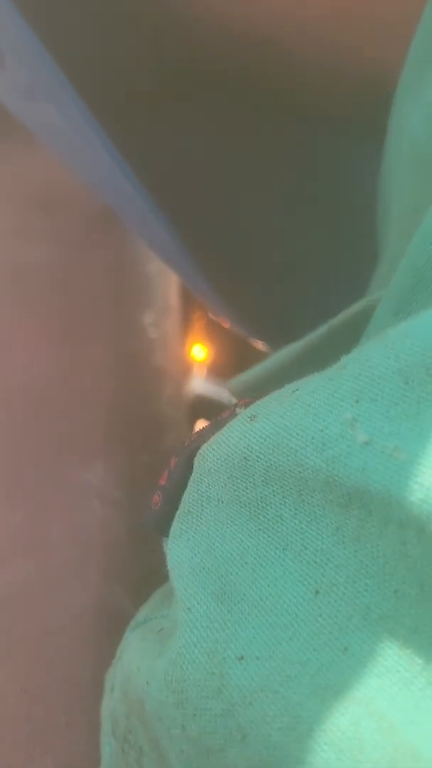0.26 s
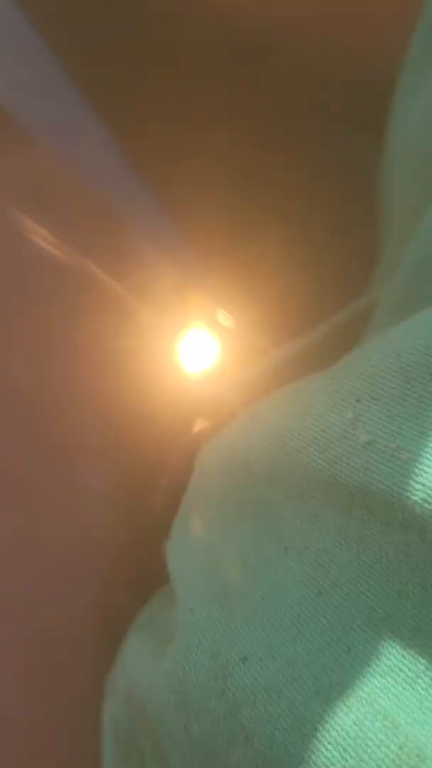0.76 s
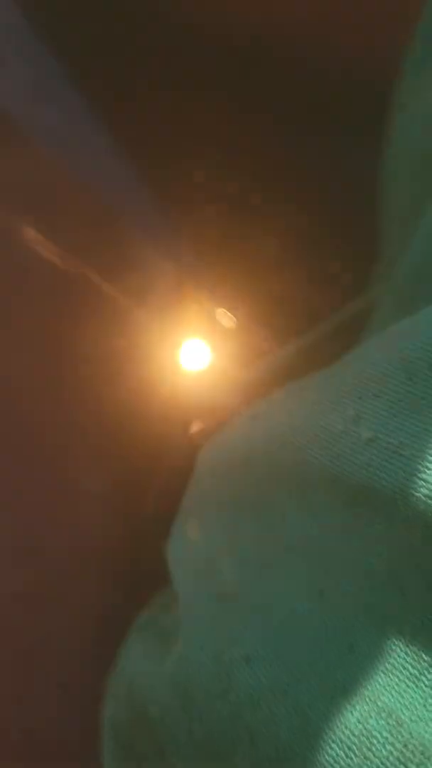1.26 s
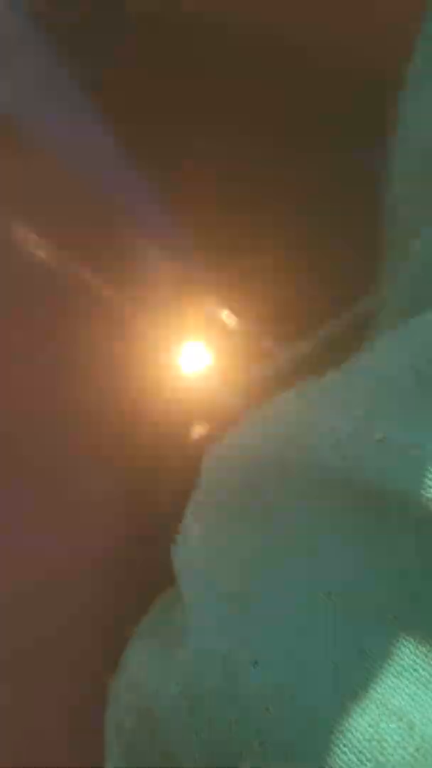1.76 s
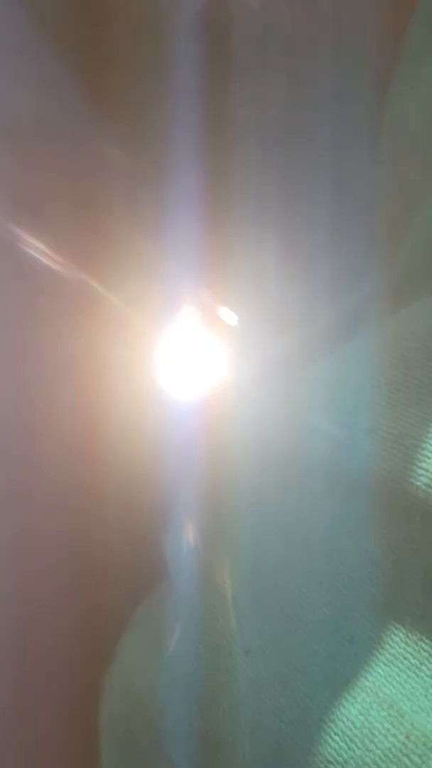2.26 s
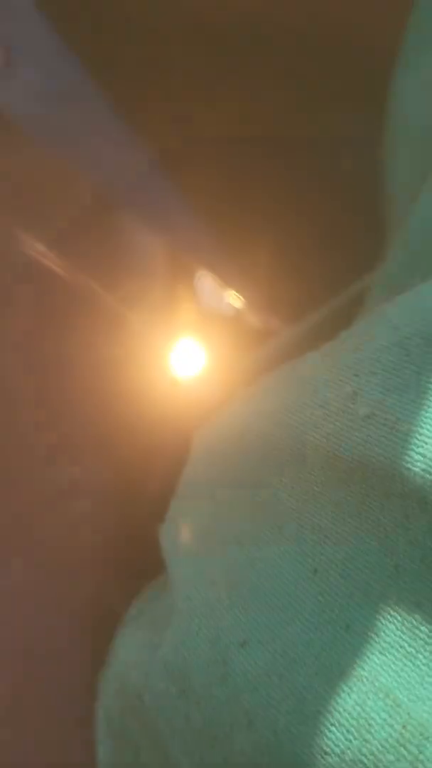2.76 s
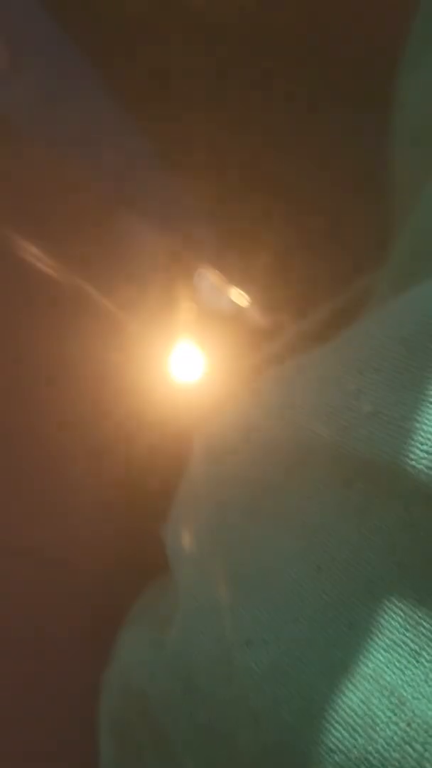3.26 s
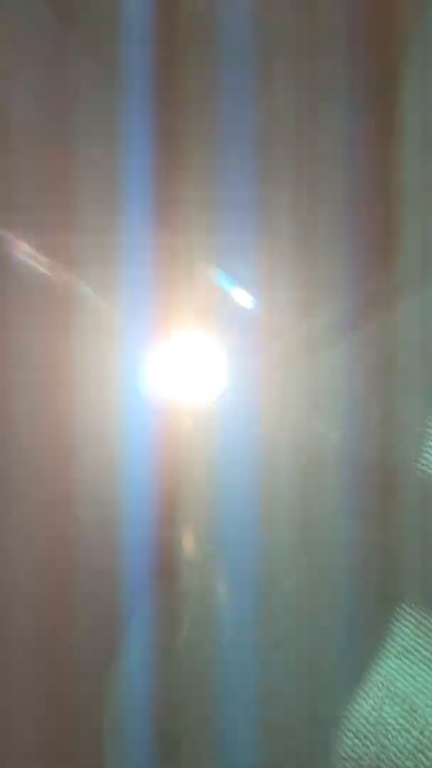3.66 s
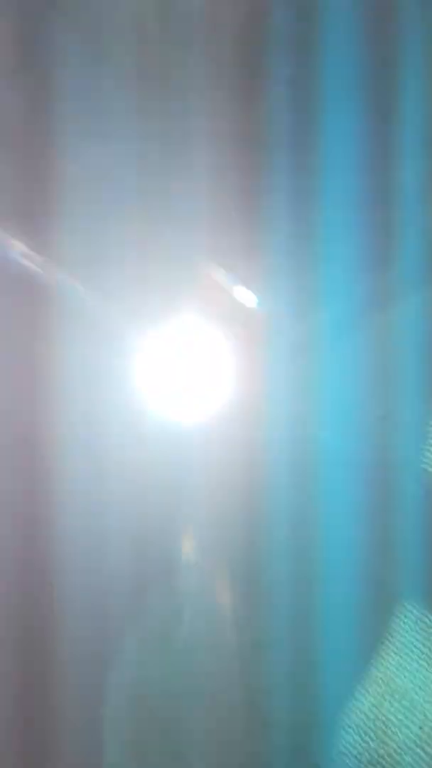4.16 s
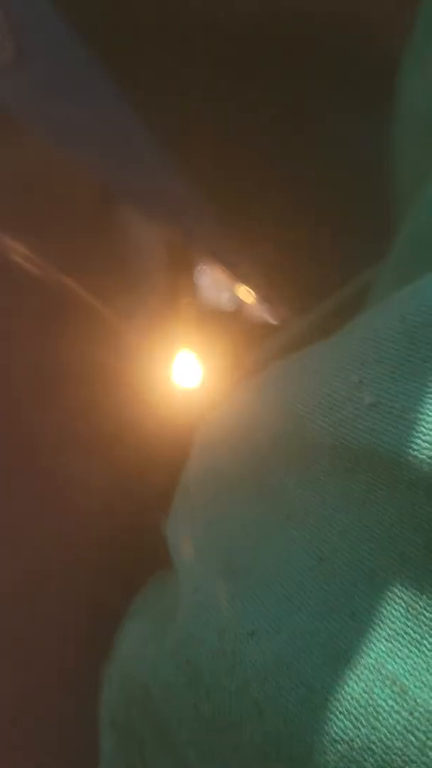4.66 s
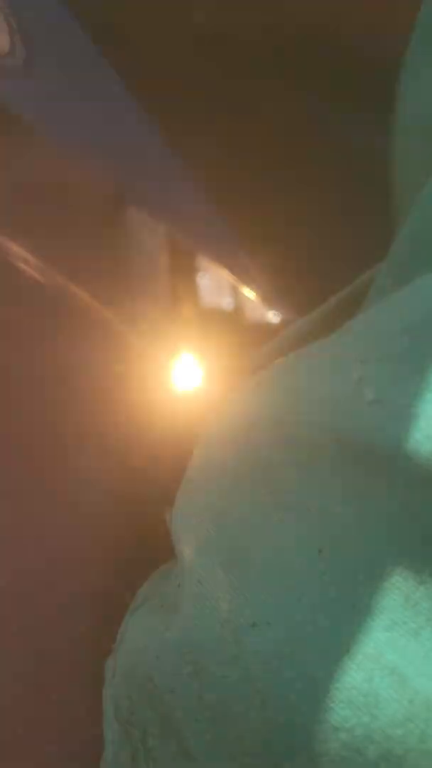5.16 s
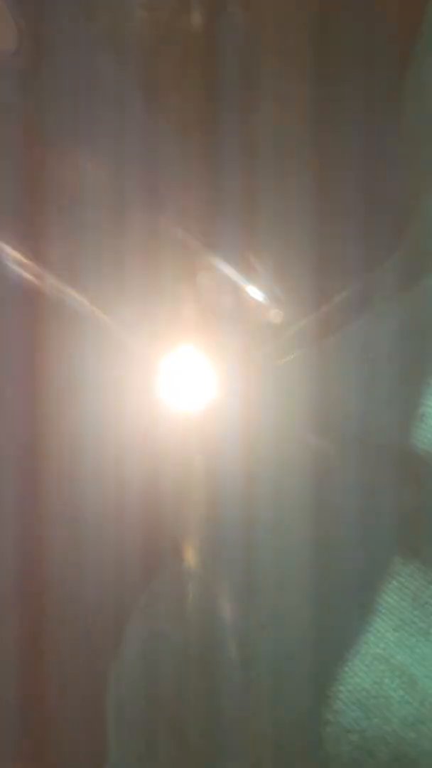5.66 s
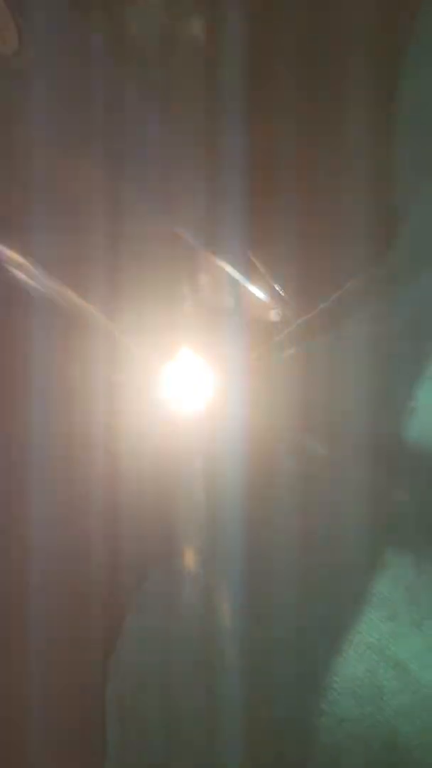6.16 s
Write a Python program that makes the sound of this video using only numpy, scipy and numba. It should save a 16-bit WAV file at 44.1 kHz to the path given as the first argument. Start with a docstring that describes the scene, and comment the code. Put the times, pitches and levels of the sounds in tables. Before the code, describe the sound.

A close stereo phone microphone picks up a continuous, bright and breathy air jet with low wind-like thumps. Over it an electric arc sputters on and off, each burst a tearing crackle of a few hundredths to a tenth or two of a second, often closed by a short low knock. The steel work rings briefly and hollowly. Towards the end the bursts run almost together, with the arc still roaring at the finish.

```python
"""A steel workshop: air carbon arc gouging in a seam, close to a phone with two microphone ports.
An air jet hisses all the time, made of coloured noise, and its gusts buffet the ports with rumbling noise.
The arc strikes, roars for a moment and breaks: bursts of fluttering noise with a growl, hiss and sharp spits.
Many breaks bring a dull pop, made of short dying tones. The left port hears the torch a fraction of a
millisecond before the right. The phone evens out the level, rounds loud peaks and cuts the top."""
import sys
import numpy as np
from scipy import signal
from scipy.fft import rfft, irfft, next_fast_len
from scipy.io import wavfile
from scipy.ndimage import uniform_filter1d
from numba import njit

SR = 44100
rng = np.random.default_rng(int(sys.argv[2]) if len(sys.argv) > 2 else 0)


def int16_out(signal):
    """Quantize to a 16-bit WAV file."""
    q = np.round(np.clip(np.atleast_2d(signal).T, -1, 1) * 32767)
    wavfile.write(sys.argv[1], SR, q.astype(np.int16))


N = 283112  # samples in the scene
SIZE = next_fast_len(N)
HZ = np.maximum(np.fft.rfftfreq(SIZE, 1 / SR), 1)  # frequency of each spectrum bin
# Source levels below stand before the groove, the mix and the phone change them.
# Colour of the top hiss of both arc and jet.
# Each row: frequency in Hz, relative level at the left port in dB, at the right port in dB.
HISS_COLOUR = [(9480, -14, -24), (11120, -8, -14), (12200, -1.5, -3.5), (13000, 0, -2.5),
               (13900, -2.5, -4.5), (15000, -1.5, -5.5), (17000, -1.5, -6)]
HISS_BAND = (11000, 15800)  # Hz
HISS_ALIKE = .6  # share of the hiss that both ports hear alike


def undb(db):
    """Turns a level in dB into a gain."""
    return 10 ** (np.asarray(db) / 20)


def walk(rate):
    """Slow random wobble: about `rate` new levels a second, smoothed twice, with a spread near 1."""
    hold = int(SR / rate)
    steps = np.repeat(rng.standard_normal(N // hold + 1), hold)
    smooth = uniform_filter1d(uniform_filter1d(steps, hold), hold)
    return 1.3 * smooth[:N]


def curve(table):
    """Joins the rows of a time table with straight lines, giving one value a sample for each column."""
    seconds, *columns = np.transpose(table)
    return [np.interp(np.arange(N) / SR, seconds, column) for column in columns]


def trail(right):
    """Turns the phase of a spectrum, since sound reaches the right port over a longer path."""
    # How far the right port trails the left. Each row: frequency in Hz, lag in radians.
    lag = [(0, 0), (330, .6), (600, 2.5), (1000, 3.4), (1400, 5.2), (2000, 6.6), (2840, 8.9), (4000, 9.3),
           (5170, 9.7), (6370, 14.4), (7750, 22.4), (8790, 22.3), (10600, 28.6), (12200, 31.1),
           (13400, 37.7), (16500, 38.8)]
    return right * np.exp(-1j * np.interp(HZ, *np.transpose(lag)))


def ports(colour, gain, likeness, band, spits=0):
    """Noise coloured for each port, partly shared; gain 1 gives rms 1 within band, averaged over the ports."""
    # The likeness fades in much of the treble. Each row: frequency in Hz, share of the likeness kept.
    kept_likeness = [(3600, 1), (4800, .55), (10000, .55), (11000, .3), (12600, .5), (13400, 1),
                     (14300, .55)]
    colour_hz, *port_dbs = np.transpose(colour)
    shape = undb([np.interp(np.log(HZ), np.log(colour_hz), db, left=-90, right=-90) for db in port_dbs])
    inside = (HZ > band[0]) & (HZ < band[1])
    shape = shape / np.sqrt(np.mean((shape * inside) ** 2))
    share = np.clip(likeness * np.interp(HZ, *np.transpose(kept_likeness)), 0, 1)
    both, left, right = (rfft(gain * rng.standard_normal(N), SIZE) for _ in range(3))
    both = both + rfft(gain * spits, SIZE)
    left = np.sqrt(share) * both + np.sqrt(1 - share) * left
    right = np.sqrt(share) * trail(both) + np.sqrt(1 - share) * right
    return irfft(shape * np.array([left, right]), SIZE)[:, :N]


def buffet():
    """Gusts from the jet swell and pass, rumbling on each port mostly on its own."""
    # Each row: time of the peak in seconds, peak level in dB (added to the calm), length in seconds.
    gust_list = [(.07, -34, .08), (.21, -34, 0.082), (0.457, -28, 0.11), (0.944, -29, 0.38),
                 (1.35, -25, 0.26), (1.82, -33, 0.14), (2.318, -29, 0.079), (2.692, -31, 0.16),
                 (3.045, -28, 0.19), (3.377, -26, 0.068), (3.915, -26, 0.24), (4.68, -31, 0.042),
                 (4.776, -22.5, 0.044), (4.876, -24, .08), (5.03, -30.5, 0.15), (5.31, -28, 0.27),
                 (5.627, -30, .15), (6.096, -31, 0.38), (6.37, -31, .06)]
    # Each row: frequency in Hz, relative level at the left port in dB, at the right port in dB.
    rumble_colour = [(20, -36, -24), (35, -8.5, -9), (54, -3, -5), (94, -4.5, -2), (138, -10, -15.5),
                     (200.5, -10.5, -8)]
    calm_db = -36.5  # rumble between gusts
    t = np.arange(N) / SR
    power = undb(calm_db) ** 2
    for peak_s, peak_db, length_s in gust_list:
        power = power + undb(peak_db) ** 2 * np.exp(-(2 * (t - peak_s) / length_s) ** 2)
    return ports(rumble_colour, np.sqrt(power) * undb(1.3 * walk(18)), 0.12, (30, 140))


def jet():
    """Turbulent air: a low rush, a broad body, a thin edge and a bright top hiss."""
    # Each row: time in seconds, level of the body in dB, level of the top hiss in dB.
    jet_levels = [(0, -24.5, -19.5), (.55, -25, -22), (1.4, -29.5, -22), (2.17, -30, -22.5),
                  (2.81, -30, -23.5), (3.36, -28, -21.5), (4.32, -28, -20), (4.9, -27.5, -20.5),
                  (5.5, -26, -20), (6.42, -24.5, -17.5)]
    # Colours of rush, body and edge.
    # Each row: frequency in Hz, relative level at the left port in dB, at the right port in dB.
    rush_colour = [(108.5, -21, -10), (159, -4, -2), (298, -6, -5), (444, -19.5, -7), (543, -44, -21)]
    body_colour = [(413, -23, -49), (503, -4, -5.5), (745, 0.5, 1.5), (1230, 3.5, -1), (1440, -2, -4.5),
                   (1800, -1.5, 0), (2570, 1.5, 2.5), (3390, 3.5, 4.5), (4050, -5.5, -15)]
    edge_colour = [(3620, -16, -14), (3770, -6.5, 3.5), (5200, 4, 1), (6600, -3.5, -7), (8280, 4, -5),
                   (10630, 1, -11)]
    rush_db, edge_re_body_db = -34.5, -4
    body_db, hiss_db = curve(jet_levels)
    eddies_db = 0.25 * walk(5.5)
    rush = ports(rush_colour, undb(rush_db + 2.0 * walk(11)), 0.39, (150, 500))
    body = ports(body_colour, undb(body_db + eddies_db), .62, (1300, 3500))
    edge = ports(edge_colour, undb(body_db + edge_re_body_db + eddies_db), .5, (4000, 9500))
    hiss = ports(HISS_COLOUR, undb(hiss_db + 0.32 * walk(26.5)), HISS_ALIKE, HISS_BAND)
    return rush + body + edge + hiss


def pops():
    """The gas pocket collapses as the arc breaks and the groove rings briefly."""
    # Each row: time in seconds, level of the blow in dB.
    pop_blows = [(0.716,-6), (0.898,-16), (0.97,-6), (1.167,-4), (1.478,3), (1.687,-3), (2.022,-7),
                 (2.72,-6.5), (3.268,-8.5), (3.561,-6.5), (4.239,-5), (4.578,-10), (5.11,-5), (5.357,-6),
                 (5.675,-9), (5.799,-7), (5.969,-9)]
    # Tones of the ring. Each row: frequency in Hz, level in dB, time to fall by 60 dB in seconds.
    pop_tones = [(349, -6, 0.042), (494, -9, 0.048), (790, 0.5, 0.023)]
    left_db = -4  # left port compared with the right
    blows = np.zeros(N)
    for s, db in pop_blows:
        blows[int(s * SR)] = undb(db)
    t = np.arange(SR // 10) / SR
    ring = 0
    for hz, db, t60 in pop_tones:
        ring = ring + undb(db) * np.sin(2 * np.pi * hz * t) * np.exp(-np.log(1000) * t / t60)
    # the minus sign makes each pop start with a dip in pressure
    pop = rfft(signal.fftconvolve(blows, -ring)[:N], SIZE)
    return irfft(np.array([undb(left_db) * pop, trail(pop)]), SIZE)[:, :N]


def ringing_power(gain, t60):
    """Stores the power of a gain curve and lets it die away, by 60 dB in t60 seconds."""
    keep = np.exp(-2 * np.log(1000) / (t60 * SR))
    return signal.lfilter([1 - keep], [1, -keep], gain ** 2)


def boom(roar, t60, level_db):
    """The hollow steel work stores some of the roar and lets it die away slowly."""
    # Each row: frequency in Hz, relative level at the left port in dB, at the right port in dB.
    hollow_colour = [(420, -35, -23), (504, 1, -1), (840, -1, 0.5), (1030, -14, -5), (1300, -32, -19)]
    stored = np.sqrt(ringing_power(roar, t60))
    return ports(hollow_colour, undb(level_db) * stored, 0.8, (500, 950))


def burning(tail_t60, build_s, flare_db, flare_s):
    """Gains of roar, growl and top hiss: on at each strike, off at each break, a short ring of the site after."""
    # Each row: strike in seconds, break in seconds, level of the roar in dB, drift of the roar from
    # strike to break in dB, level of the low growl compared with the roar in dB.
    burns = [(0.539, 0.667, -19, 11, -8.5), (0.678, 0.726, -18, 11, -2.5), (0.729, 0.735, -18.5, 47, 4),
             (0.748, 0.787, -14, 1, -1), (0.849, 0.899, -16.5, 4.5, -0.5), (0.943, 0.97, -16.5, 15, 4),
             (1.063, 1.179, -15, 1, -9.5), (1.453, 1.49, -16, -2.5, -2.5), (1.651, 1.699, -14, -3, -3.5),
             (1.882, 2.003, -16, 1.5, -6.5), (2.007, 2.026, -14, 2, -3), (2.295, 2.366, -21.5, -3, -3.5),
             (2.361, 2.443, -15.5, 2.5, -7.5), (2.69, 2.725, -16.5, 5, -1.5), (2.88, 2.978, -16, 2.5, -4),
             (3.029, 3.112, -21.5, -3, -5.5), (3.113, 3.276, -21.5, 5.5, -6), (3.434, 3.484, -17, 8, 1),
             (3.537, 3.564, -14, 1, -2.5), (3.663, 3.796, -16, -0.5, -5.5), (3.939, 3.984, -16.5, 3, -2.5),
             (4.206, 4.251, -17, 0, -3), (4.383, 4.471, -18, -1, -6), (4.478, 4.58, -17.5, 3, -6),
             (5.016, 5.119, -17, 2, -8.5), (5.246, 5.366, -17, -0.5, -6), (5.434, 5.5, -16.5, 3, -3.5),
             (5.502, 5.591, -17, 0, -2), (5.635, 5.812, -17.5, 0, -2.5), (5.837, 5.916, -17, -4, 0.5),
             (5.934, 5.982, -16.5, 3, -0.5), (5.987, 6.43, -17, 2.5, -2.5)]
    # a burn starts a little under its level, swells, and sags just before the break
    strike_db, swell_s, sag_db, sag_s = -3, 0.0054, -4.5, 0.0057
    arc_hiss_db = -24  # alike in all burns once the flare has settled
    edge_s = .004  # softens each start and stop
    gains = np.zeros((3, N))
    for strike, stop, level_db, drift_db, growl_db in burns:
        i, j = int(strike * SR), min(int(stop * SR), N)
        since = np.arange(j - i) / SR
        roar_db = level_db + drift_db * np.linspace(-.5, .5, j - i)
        roar_db = roar_db + strike_db * np.exp(-since / swell_s)
        roar_db = roar_db + sag_db * np.exp((since + strike - stop) / sag_s)
        # the top hiss flares at the strike and settles
        hiss_db = arc_hiss_db + flare_db * np.exp(-since / flare_s)
        gains[:, i:j] = undb([roar_db, roar_db + growl_db, hiss_db])
    # the growl builds up as the melt pool grows, but stops with the arc
    slow = np.exp(-1 / (build_s * SR))
    built_up = signal.lfilter([1 - slow], [1, -slow], gains[1])
    gains[1] = np.minimum(gains[1], built_up)
    gains = uniform_filter1d(gains, int(edge_s * SR), axis=1)
    ring = ringing_power(gains, tail_t60)
    return np.sqrt(gains ** 2 + undb(-11.0) ** 2 * ring)


def arc():
    """The arc wanders, so its roar flutters from one millisecond to the next, and it spits droplets of steel."""
    # Colours of roar and growl.
    # Each row: frequency in Hz, relative level at the left port in dB, at the right port in dB.
    roar_colour = [(640, -44, -47), (640, -4.5, 0), (880, 5.5, 4), (1205, -3, -11.5), (1560, -4.5, 1),
                   (2230, -2.5, 0), (2510, -4.5, 2), (3530, 0, -2), (4360, -6.5, -6.5), (5720, -12, -11),
                   (6200, -14, -36.5), (8200, -12, -15.5), (10400, -23, -23)]
    growl_colour = [(116, -32, -21), (188, -6.5, -2.5), (280, -7.5, -1.5), (409, -11, 6.5), (434, -18, -9),
                    (562, -6.5, -3.5), (696, -32, -64)]
    roar, growl, hiss = burning(tail_t60=0.13, build_s=0.01, flare_db=2.0, flare_s=0.015)
    sputter_db = 0.9 * walk(60) + 0.8 * walk(20)
    # sharp clicks at random moments, about 700 a second, heard while the roar is on
    spit_sizes = undb(9 + 3 * rng.exponential(size=N))
    spits = -spit_sizes * (rng.random(N) < 700 / SR)
    roar_gain = roar * undb(sputter_db + 0.97 * walk(500))
    growl_gain = growl * undb(sputter_db + 0.74 * walk(45))
    hiss_gain = hiss * undb(2.1 * walk(90))
    return (ports(roar_colour, roar_gain, .8, (1300, 3500), spits)
            + ports(growl_colour, growl_gain, 0.67, (200, 600))
            + ports(HISS_COLOUR, hiss_gain, HISS_ALIKE, HISS_BAND)
            + boom(roar, t60=0.63, level_db=-11))


def groove(torch):
    """Groove and nearby surfaces add peaks and dips, which blend into others as the torch moves on."""
    # Each row: frequency in Hz, width in Hz, left port before the move in dB, right before in dB,
    # left after the move in dB, right after in dB.
    path_colour = [(505, 34, 3, 4.5, 4, 2.5), (593, 48, 4, 1, -3, 5.5), (772, 135, 2, 3, 0.5, 3.5),
                   (924, 69, -14.5, -0.5, -12.5, -4), (1250, 133, -3, -15.5, -6.5, -10.5),
                   (1675, 510, 4.5, -2.5, 0.5, -1.5), (1806, 56, -6, -9.5, -4.5, -9),
                   (2030, 100, -1.5, -3.5, -1, 2), (2380, 250, -2.5, -4, -0.5, -2),
                   (2474, 73, 7, 1.5, 1.5, 2.5), (2760, 84, -4.5, 5, 4.5, 0.5),
                   (3150, 82, 0.5, -14, -4, -12.5), (3460, 200, 3, 5, -1, -1.5), (3950, 250, -5, -7, 0, 0),
                   (4750, 600, 2, -1, -1, -2), (5550, 400, -4, -3, -1, -3), (6800, 1500, 0, 4, 0.5, 2.5),
                   (8550, 700, -4, -7, -4, -6), (10500, 1200, 1, 0, -2.5, -2.5),
                   (12400, 900, 0, 1.5, -0.5, -1), (13350, 450, -1, 0, 3, 1),
                   (14400, 900, -0.5, 0, 0, -2.5), (15300, 500, 0, 0, 2, 1.5)]
    # The torch moves along the seam between these times: start in seconds, end in seconds.
    move_times = (2.5, 3.8)
    db = 0
    for hz, width, *dbs in path_colour:
        bump = np.exp(-.5 * ((HZ - hz) / (width / 2)) ** 2)
        db = db + np.outer(dbs, bump)
    filters = undb(db).reshape(2, 2, -1)  # before or after, then left or right
    before, after = irfft(filters * rfft(torch, SIZE), SIZE)[..., :N]
    moved = np.interp(np.arange(N) / SR, move_times, [0, 1])
    return (1 - moved) * before + moved * after


def scene():
    """Arc and jet sound through the groove, while gusts and pops are added directly."""
    torch = groove(arc() + jet())
    return undb(-0.2) * (torch + buffet()) + pops()


@njit
def settle(goal, down, up):
    """Follows its goal at one speed downwards and at another upwards."""
    followed, level = np.empty(len(goal)), goal[0]
    for i in range(len(goal)):
        level += (goal[i] - level) * (down if goal[i] < level else up)
        followed[i] = level
    return followed


def record(dry):
    """The phone pulls the level towards an aim, down quickly and up slowly, rounds peaks and cuts the top."""
    aim_db, pull, most_db = -11.5, 0.83, 7  # pull: share of the gap made up; most_db: greatest boost
    down_s, up_s = 0.076, 0.58
    top_hz = 15710
    power = uniform_filter1d(np.mean(dry ** 2, axis=0), SR // 50)
    heard_db = 10 * np.log10(power + 1e-12)
    goal_db = np.minimum(pull * (aim_db - heard_db), most_db)
    gain_db = settle(goal_db, 1 / (down_s * SR), 1 / (up_s * SR))
    loud = dry * undb(gain_db)
    rounded = loud / (1 + loud ** 4) ** (1 / 4)
    top_cut = signal.ellip(14, .2, 80, top_hz, fs=SR, output="sos")
    return signal.sosfilt(top_cut, rounded)


dry = scene()
out = record(dry)
int16_out(out)
```